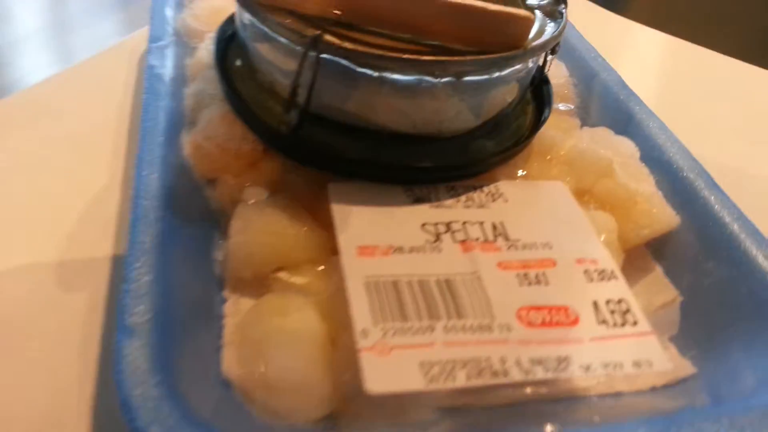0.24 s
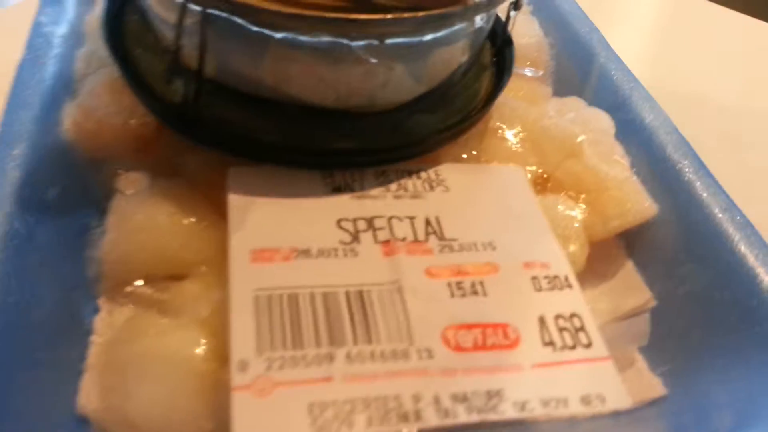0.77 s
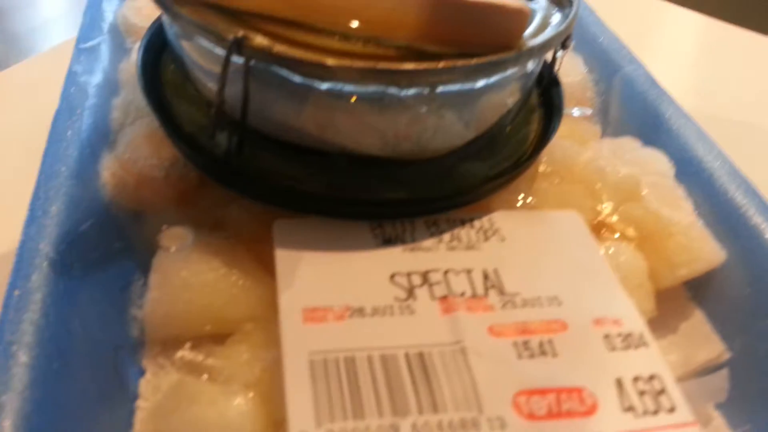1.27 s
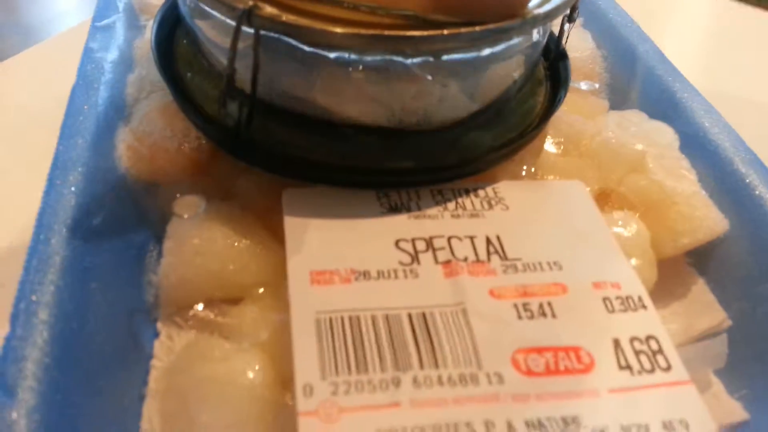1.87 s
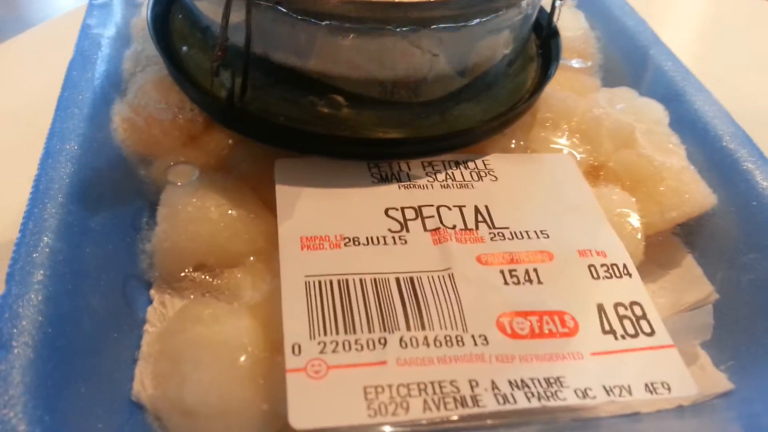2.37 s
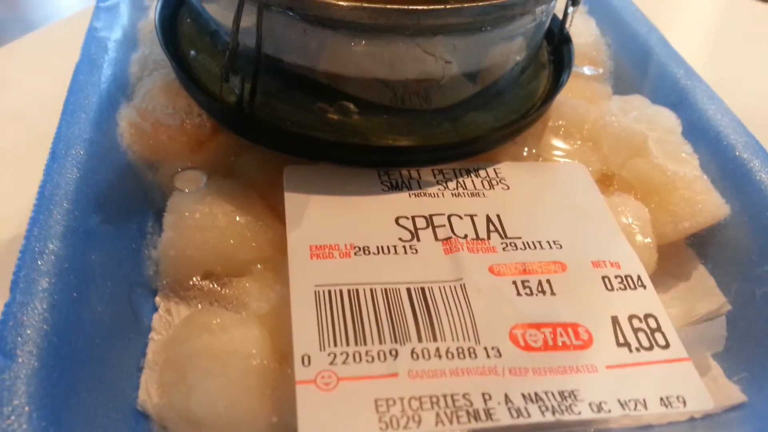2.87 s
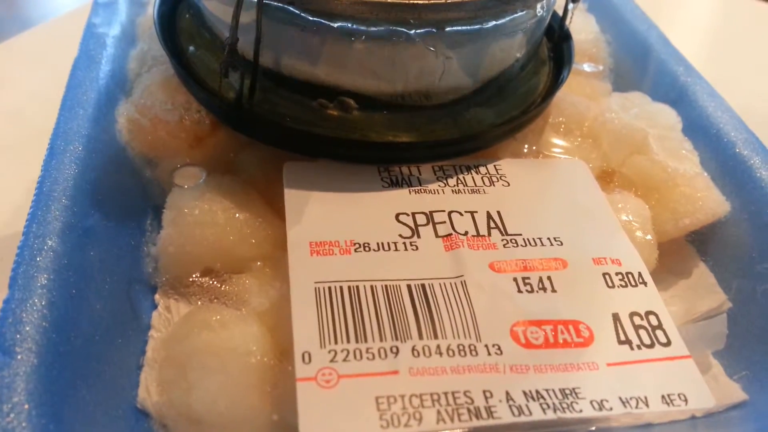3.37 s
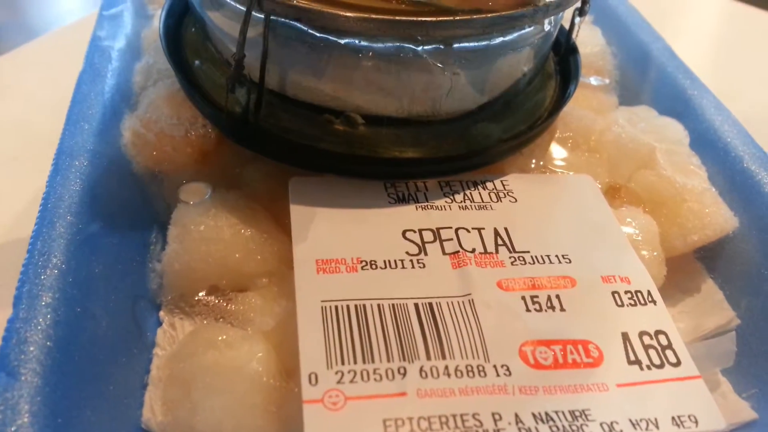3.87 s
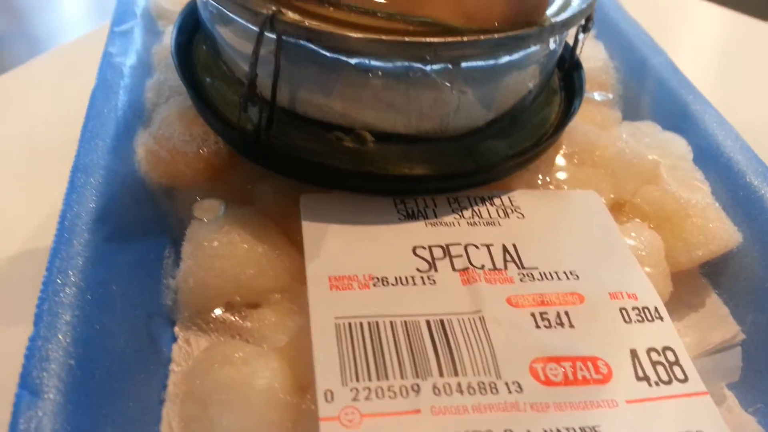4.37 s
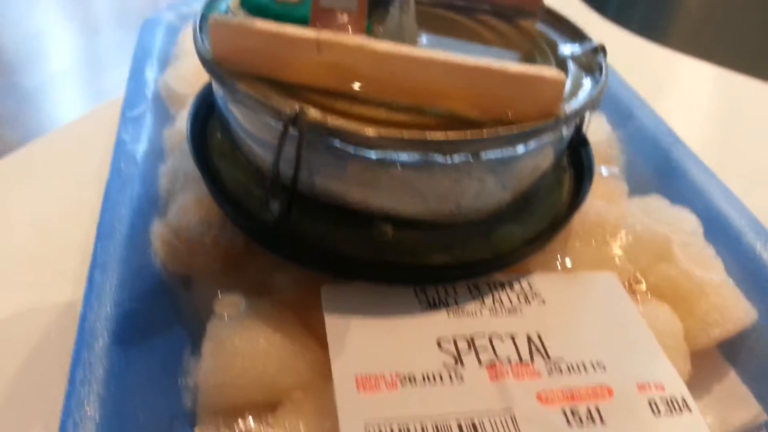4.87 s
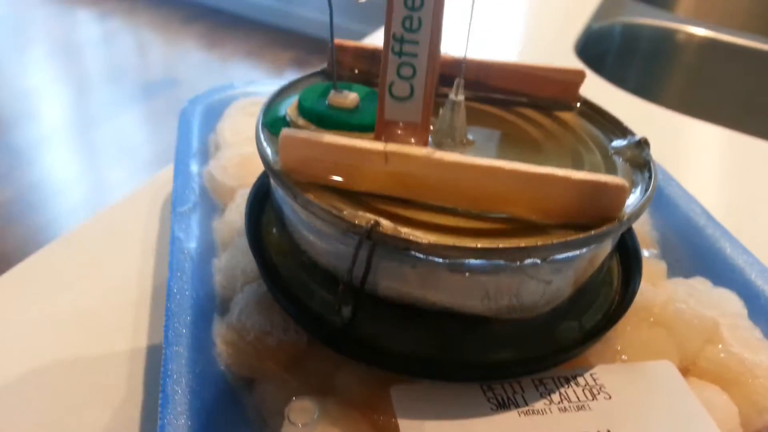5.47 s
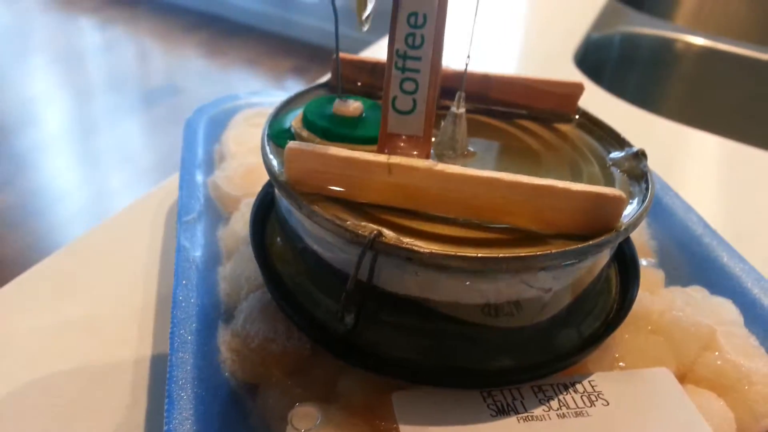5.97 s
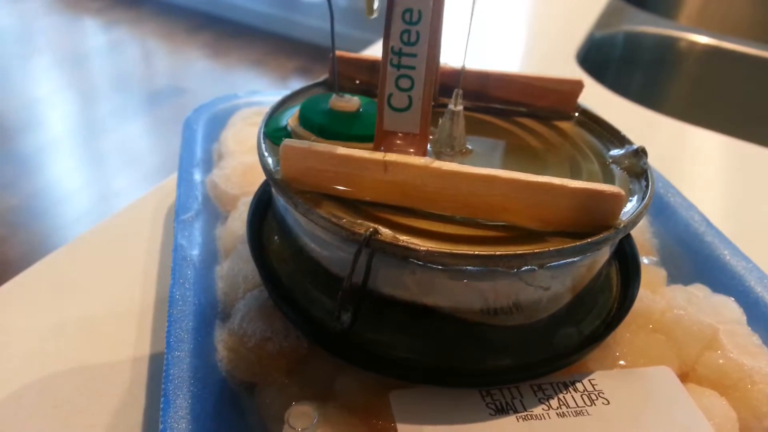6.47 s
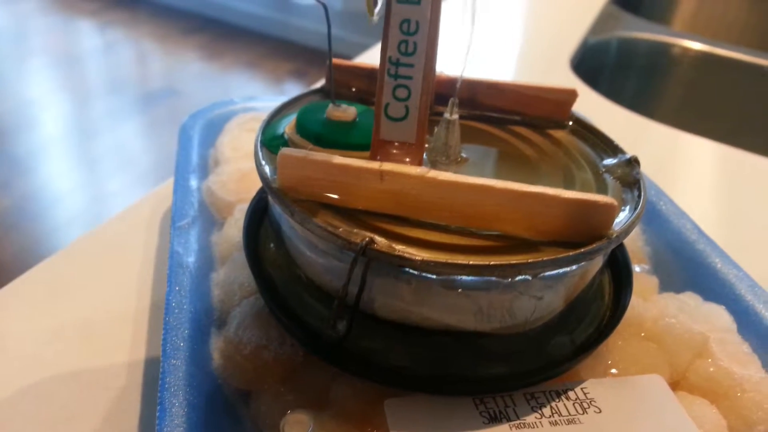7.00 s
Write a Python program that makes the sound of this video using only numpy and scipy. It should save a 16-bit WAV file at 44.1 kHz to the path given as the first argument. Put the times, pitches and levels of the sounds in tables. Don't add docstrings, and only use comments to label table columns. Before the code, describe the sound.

Steady dry metal ticks, short and slightly uneven in strength, sit over a continuous deep hum with gentle beating and airy rumble. Quiet hollow can bumps fall between them. Close to the left side, the holding hand makes little pops, scrapes, one crisp loud knock early on and a blunt thump a second later. The small room adds only a faint short echo, with soft hiss rising around sharp sounds.

```python
import sys
import numpy as np
from scipy import signal
from scipy.io import wavfile
from scipy.ndimage import uniform_filter1d

SR = 44100
rng = np.random.default_rng(int(sys.argv[2]) if len(sys.argv) > 2 else 0)


def pcm_store(signal):
    levels = np.round(np.clip(np.atleast_2d(signal), -1, 1) * 32767)
    wavfile.write(sys.argv[1], SR, levels.astype(np.int16).T)


def level_to_linear(level):
    exponent = np.asarray(level, float) / 20
    return 10 ** exponent


N = 319284

# (time [s], peak level [dB], left-right [dB], 3 kHz ring [dB], 4.5 kHz ring [dB])
CRANK_SNAPS = [(0.3754, -28, 0.5, 0.5, 14), (0.9729, -22, 0, -6.5, 1), (1.5788, -33.5, 3.5, 3.5, 14),
               (2.186, -29.5, 1, -0.5, 6.5), (2.7947, -32.5, 1, 5, 9), (3.405, -30.5, -1.5, 6, 8),
               (4.014, -31.5, 3, 1.5, 7.5), (4.6236, -25, 2, -5, 2), (5.237, -27, -3.5, -6, 5.5),
               (5.853, -20.5, 0.5, -11, -4), (6.4745, -25, 6.5, -16, -1), (7.108, -23.5, -1.5, -4.5, -2)]


def evened(x):
    return x / np.sqrt(np.mean(x ** 2) + 1e-20)


def peaked(x):
    return x / abs(x).max()


def read(points, hz):
    f, value = np.transpose(points)
    return np.interp(np.log(hz + 1), np.log(f + 1), value)


def add(mix, s, sound):
    part = mix[:, round(s * SR):][:, :sound.shape[1]]
    part += sound[:, :part.shape[1]]


def ring(hz, t60, size=3000):
    t = np.arange(size) / SR
    swing_up = 1 - np.exp(-t * hz / 1.08)
    return level_to_linear(-60 * t / t60) * swing_up * np.sin(2 * np.pi * hz * t)


def band(x, hz, width):
    return signal.lfilter(*signal.iirpeak(hz, hz / width, SR), x)


def drift(rate):
    t = np.arange(0, N + 400, 400) / SR
    slow = sum(np.sin(2 * np.pi * (f * t + rng.random())) / np.sqrt(f)
               for f in np.geomspace(rate / 10, rate, 20))
    return np.interp(np.arange(N) / SR, t, evened(slow))


def noise(spectrum, likeness, patchy_db):
    hz = np.fft.rfftfreq(2048, 1 / SR)
    a, b, c, d, patches = rng.standard_normal((N // 512 + 5, 1025, 5)).T
    patches = uniform_filter1d(patches, size=14, axis=0)
    patches = evened(uniform_filter1d(patches, size=6, axis=1))
    shared = np.clip(read(likeness, hz), -1, 1)[:, None]
    left = a + 1j * b
    right = shared * left + np.sqrt(1 - shared ** 2) * (c + 1j * d)
    z = np.array([left, right]) * level_to_linear(read(spectrum, hz)[:, None] + patchy_db * patches)
    return evened(signal.istft(z, nperseg=2048, noverlap=1536)[1][:, :N])


def ticks():
    # (frequency [Hz], t60 [s], left level [dB], right level [dB])
    lid_modes = [(1810, 0.027, -71, -10.5), (2000, 0.012, -2, -18), (2194, 0.0077, -12.5, -1),
                 (2850, 0.0094, -13, -10), (2915, 0.02, -5, -15.5), (3780, 0.011, -40, -18),
                 (4550, 0.01, -13, -29), (4940, 0.014, -15.5, -33.5), (5540, 0.0045, -8, -11),
                 (5940, 0.0022, -24, 2.5), (6460, 0.0035, -48, -3.5), (6820, 0.0027, -45, -17),
                 (9670, 0.0067, -22, -14.5), (11250, 0.0055, -25, -13.5), (13200, .003, -30, -13)]
    soft_tick_db = -32
    soft_treble_db, treble_loss = 0.34, 0.82
    out, t = np.zeros((2, N)), np.arange(900) / SR
    first_hit = (t / 0.0006) ** 2 * np.exp(-t / 0.00058)
    bounce = 0.081 * np.exp(-((t - .0065) / 0.00075) ** 2)
    buzz = 0.052 * np.exp(-t / 0.026)
    for s, db, pan_db, middle_db, upper_db in CRANK_SNAPS:
        treble_db = soft_treble_db - treble_loss * (db - soft_tick_db)
        contacts = rng.standard_normal(900) * (rng.random(900) < .6)
        chatter = contacts * (first_hit + bounce + buzz)
        detune = rng.uniform(1.0, 1.015, len(lid_modes))
        sound = np.zeros((2, 3899))
        for (hz, t60, left, right), k in zip(lid_modes, detune):
            struck = signal.fftconvolve(ring(hz * k, t60), chatter)
            colour_db = treble_db * (hz > 5100)
            colour_db += middle_db * (2500 < hz < 3500) + upper_db * (3500 < hz < 5100)
            sound += level_to_linear(np.array([[left], [right]]) + colour_db) * struck / np.linalg.norm(struck)
        add(out, s, level_to_linear(db + 8 + np.array([[.5], [-.5]]) * pan_db) * sound)
    return signal.sosfilt(signal.butter(6, 1400, "highpass", fs=SR, output="sos"), out)


def strokes():
    # (delay after tick [s], peak level [dB], lid ring [dB], contact [s])
    turn_bumps = [
        (.0125, -42, -20, .0065),
        (.12, -44.5, -23, .016),
        (.35, -45, -20, 0.0064),
    ]
    # (top of stroke [dB], fall [dB], return [dB])
    firmness = [(0, 0, -1.5), (-1.5, 0.5, -7), (-1.5, 0, 2.5), (-1, -2, -3), (-2.5, 1.5, 3),
                (-0.5, -4.5, 1.5), (-0.5, 0.5, -0.5), (2, 1, 0.5), (0, 2, -0.5), (2, 2.5, 1), (-1, 1, -2),
                (2, 1, -9), (-2.5, -10, 0)]
    # (time [s], peak level [dB], lid ring [dB], contact [s])
    stray = (5.5, -44, -21, .01)
    uneven_lid_db = 2
    turn_starts = [-.222] + [row[0] for row in CRANK_SNAPS]
    rows = [stray]
    for start, landing in zip(turn_starts, firmness):
        scatter = rng.standard_normal(3).clip(-2, 2)
        for (delay, db, lid_db, contact), firm_db, a in zip(turn_bumps, landing, scatter):
            rows.append((start + delay, db + firm_db, lid_db + uneven_lid_db * a, contact))
    return [row for row in rows if 0 < row[0] < N / SR]


def bumps():
    # (frequency [Hz], t60 [s], level [dB])
    can_modes = [(500, 0.028, 20), (644, 0.024, 17), (970, 0.0059, -21)]
    # (frequency [Hz], t60 [s], level [dB])
    tapped_modes = [(1700, 0.0083, 36), (2080, 0.0093, -44.5)]
    out, t = np.zeros((2, N)), np.arange(1500) / SR
    can = sum(level_to_linear(db) * ring(hz, t60) for hz, t60, db in can_modes)
    lid = sum(level_to_linear(db) * ring(hz, t60) for hz, t60, db in tapped_modes)
    for s, db, lid_db, contact in strokes():
        onset = np.clip(t / 0.00048, 0, 1)
        rub = rng.standard_normal(1500) * onset * np.exp(-(t / contact) ** 2)
        tap = rng.standard_normal(1500) * np.exp(-((t - 0.4 * contact) / 0.0026) ** 2)
        low = peaked(signal.fftconvolve(rub, can)) * level_to_linear([[-.5], [.5]])
        high = peaked(signal.fftconvolve(tap, lid)) * level_to_linear([[-2], [2]])
        add(out, s, level_to_linear(db + 2.0) * (low + level_to_linear(lid_db + 8.0) * high))
    return out


def kitchen(x):
    t = np.arange(8000) / SR
    sparse = rng.choice([-1., 1.], (2, 8000)) * (rng.random((2, 8000)) < .05)
    taps = sparse * level_to_linear(-60 * t / 0.26) * (t > .003)
    return signal.fftconvolve(x.mean(0)[None], taps / np.linalg.norm(taps[0]), axes=1)[:, :N]


def pushes():
    # (time [s], peak level [dB], first pitch [Hz], cycles, pressed 1 or let go -1)
    creaks = [(0.5674, -32, 450, 0.48, -1), (0.7374, -25, 270, 0.33, -1), (0.7597, -40, 810, 0.95, 1),
              (1.1905, -29, 350, 0.71, -1), (1.2308, -32, 300, 0.58, -1), (2.23, -31.5, 435, 2.2, 1),
              (2.232, -25, 252, 0.77, -1), (2.2714, -33, 402, 1.3, -1), (2.5407, -30.5, 405, 0.4, 1),
              (2.594, -20, 1350, 0.26, 1), (2.987, -29.5, 500, 0.71, 1), (3.016, -27, 566, 0.69, 1),
              (3.7332, -27.5, 277, 0.67, -1), (4.478, -32, 400, 0.94, -1), (4.816, -36, 550, 0.39, 1),
              (4.9666, -22, 646, 0.44, -1), (5.4857, -29, 685, 0.85, 1), (6.1909, -23.5, 590, 0.92, 1),
              (6.45, -32.5, 460, 0.6, -1), (6.6634, -28, 542, 0.4, -1), (6.8904, -28.5, 650, 0.53, 1)]
    # (time [s], peak level [dB], first pitch [Hz], cycles, pressed 1 or let go -1)
    fingertip = [
        (2.2267, -7.5, 860, 0.4, 1),
        (4.6149, -21.5, 605, 0.27, 1),
    ]
    creak_soft, thump_soft = 0.13, 2.07
    out, t = np.zeros((2, N)), np.arange(1200) / SR
    rows = [(*row, creak_soft) for row in creaks] + [(*row, thump_soft) for row in fingertip]
    for s, db, hz, cycles, way, soft in rows:
        u = t * hz / cycles
        swing = np.sin(np.pi * (2 * hz * t) ** 0.82)
        skin = signal.butter(3, 2.44 * hz, fs=SR)
        push = signal.lfilter(*skin, u ** soft * np.exp(-u) * swing)
        add(out, s - .0002, level_to_linear(db) * way * peaked(push) * level_to_linear([[0], [-30]]))
    return out


def slips():
    # (time [s], peak level [dB], width [ms], direction)
    single = [(.5848, -27, 0.096, 1), (.7593, -28, 0.16, 1), (.9435, -28, 0.21, 1),
              (1.1835, -26.5, 0.11, -1), (1.2499, -11.5, 0.2, -1), (1.2514, -5.5, 0.028, -1),
              (1.2528, -17, 0.027, -1), (1.2736, -16.5, 0.27, -1)]
    # (start [s], slips, spacing [s], first level [dB], width [ms])
    runs = [
        (1.1932, 4, .0127, -32, .14),
        (1.2548, 8, .004, -18, 0.038),
    ]
    fade_db = -1.5
    rows = list(single)
    for start, count, spacing, db, width in runs:
        for k, (a, b, c) in enumerate(rng.uniform(-1.2, 1, (count, 3))):
            s = start + spacing * (k + .4 * a)
            rows.append((s, db + fade_db * k + 3 * b, width * 1.7 ** c, -1))
    return rows


def snaps():
    out, t = np.zeros((2, N)), np.arange(1200) / SR
    for s, db, width, way in slips():
        u = (t - .001) / (width * 0.00073)
        spike = np.exp(-abs(u)) - 0.06 * np.exp(-abs(u - 4) / 5)
        add(out, s - .001, level_to_linear(db) * way * spike * level_to_linear([[0], [-26]]))
    return out


def shakes():
    # (time [s], level [dB])
    blows = [
        (1.2524, -29),
        (1.255, -15.5),
        (1.2725, -20),
    ]
    # (frequency [Hz], t60 [s], level [dB])
    phone_modes = [(60, 0.078, -27), (145, 0.054, 4.5), (212, 0.091, -9.5), (250, 0.03, 6)]
    out = np.zeros((2, N))
    body = peaked(sum(level_to_linear(db) * ring(hz, t60, size=6000) for hz, t60, db in phone_modes))
    for s, db in blows:
        add(out, s, level_to_linear(db) * body * level_to_linear([[0], [-22]]))
    return out


def rubs():
    # (start [s], length [s], level [dB], centre [Hz], change to the end [dB])
    skin = [(0.559, 0.12, -64.5, 2200, -6), (1.176, 0.12, -63, 2930, 2), (1.248, 0.035, -54, 1900, -17),
            (1.248, 0.075, -49, 8000, -17), (2.422, .054, -68.5, 1440, 4), (2.956, .066, -67.5, 1500, -4),
            (4.174, .027, -70.5, 4080, 5), (5.03, 0.065, -60, 970, -13), (6.168, 0.043, -60, 1500, -13)]
    # (start [s], length [s], level [dB], centre [Hz], change to the end [dB])
    nail = [(.735, 0.063, -65.5, 3500, -2.5), (.905, 0.059, -66, 2600, 12), (0.897, 0.06, -60, 750, 10.5),
            (1.255, 0.11, -50.5, 4900, -17.5), (.717, 0.014, -51, 590, -3)]
    skin_width, nail_width = 1.4, 0.66
    pan_db = np.array([[.5], [-.5]]) * 12
    out = np.zeros((2, N))
    rows = [(*row, skin_width) for row in skin] + [(*row, nail_width) for row in nail]
    for start, length, db, hz, fade_db, share in rows:
        size, width = round(length * SR), share * hz
        clumps = np.repeat(rng.exponential(1, 150).clip(0, 4), 40)
        grains = rng.standard_normal((2, 6000)) * level_to_linear(2.6 * clumps)
        rub = evened(band(band(grains, hz, width), hz, width))[:, :size]
        rise = np.clip(np.arange(size) / 90, 0, 1)
        fall = np.sqrt(np.clip(np.arange(size)[::-1] / 900, 0, 1))
        add(out, start, level_to_linear(db + fade_db * np.linspace(0, 1, size) + pan_db) * rub * rise * fall)
    return out


def fridge():
    tone_hz = [110.885, 115.68, 119.97, 203.5, 221.8, 231.3, 240, 289.1, 297.8]
    # (rms level [dB], waver [dB])
    tone_levels = [(-50.5, 2), (-54.5, 4), (-50, 1.5), (-65.5, 6), (-66, -5), (-69.5, 0), (-70.5, 2),
                   (-72.5, -8.5), (-72.5, 9)]
    # (frequency [Hz], width [Hz], level [dB])
    cabinet = [(94.9, 4.6, -58), (155.7, 12, -55.5), (294.6, 63, -59), (1473, 22, -82), (1873, 1060, -82)]
    # (frequency [Hz], level per Hz [dB])
    air_colour = [(15, -60), (25, -14), (36, -5.5), (52, -6), (80, -5), (118, 0.5), (190, -3.5),
                  (257, -11.5), (330, -11), (549, -12.5), (680, -17), (842, -22.5), (1300, -33.5),
                  (2600, -48), (5000, -100)]
    # (frequency [Hz], left-right likeness)
    air_likeness = [(30, .3), (50, 0.22), (75, 1), (150, 0.72), (380, 0.7), (950, 0.086), (2400, .06),
                    (15000, .07)]
    beat_s = 2.976
    fan_hz, fan_db, fan_waver_db = 173.49, -48.5, 1.3
    air_db, swell_db = -48.5, .9
    t = np.arange(N) / SR
    tones = np.zeros(N)
    for hz, (db, waver_db) in zip(tone_hz, tone_levels):
        tones += level_to_linear(db + waver_db * drift(4.2)) * np.cos(2 * np.pi * hz * (t - beat_s))
    tones += level_to_linear(fan_db + fan_waver_db * drift(5.5)) * np.sin(2 * np.pi * fan_hz * t)
    drone = np.zeros(N)
    for hz, width, db in cabinet:
        drone += level_to_linear(db) * evened(band(band(rng.standard_normal(N), hz, width), hz, width))
    air = level_to_linear(air_db + swell_db * drift(3.2)) * noise(air_colour, air_likeness, 1.95)
    return np.sqrt(2) * tones + drone + air


def microphone_hiss(dry):
    # (frequency [Hz], level per Hz [dB])
    hiss_colour = [(590, -3.5), (1000, -15.5), (1160, -7.5), (1480, -8), (1970, -10), (2130, -13.5),
                   (2940, -15.5), (3400, -17), (4800, -16.5), (8110, -20), (14300, -21.5)]
    hiss_db = -67
    sharp = signal.sosfilt(signal.butter(2, 700, "highpass", fs=SR, output="sos"), dry)
    power = uniform_filter1d((sharp ** 2).max(0), size=600)
    power_db = 10 * np.log10(abs(power) + 1e-12)
    fall = np.arange(N) * 280.0 / SR
    held_db = np.maximum.accumulate(np.clip(power_db + 55.0, 0, 12.0) + fall) - fall
    gain = level_to_linear(hiss_db + 5.0 + 0.77 * uniform_filter1d(held_db, size=450))
    return gain * noise(hiss_colour, [(20, 0.02), (20000, 0.017)], 1.0)


def scene():
    engine = ticks() + bumps()
    hand = pushes() + snaps() + shakes() + rubs()
    return engine + level_to_linear(-15.5) * kitchen(engine) + hand + fridge()


def roll_off(x):
    return signal.sosfilt(signal.butter(12, 15800, fs=SR, output="sos"), x)


def record(dry):
    edge = signal.firwin(101, 14620, fs=SR)[None]
    heard = signal.oaconvolve(dry + microphone_hiss(dry), edge, "same")
    return roll_off(heard)


dry = scene()
out = record(dry)
pcm_store(out)
```